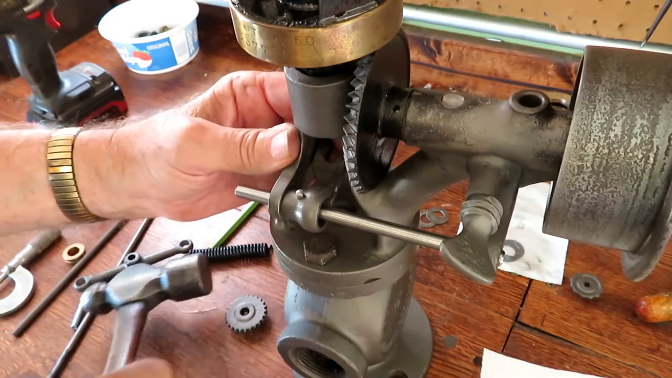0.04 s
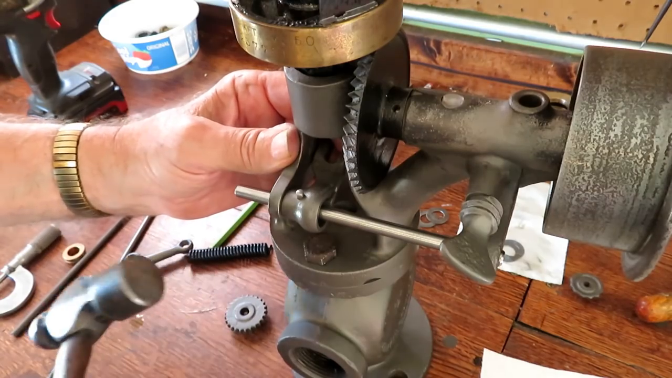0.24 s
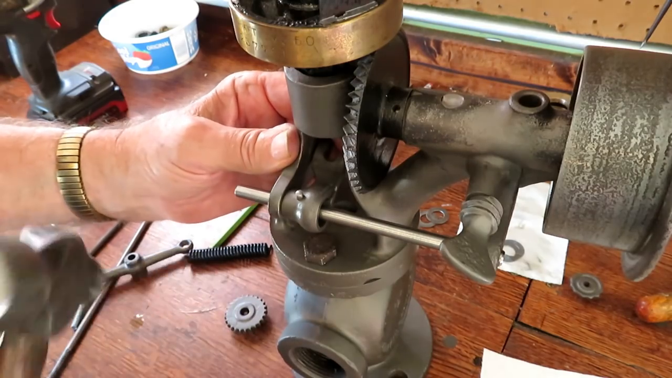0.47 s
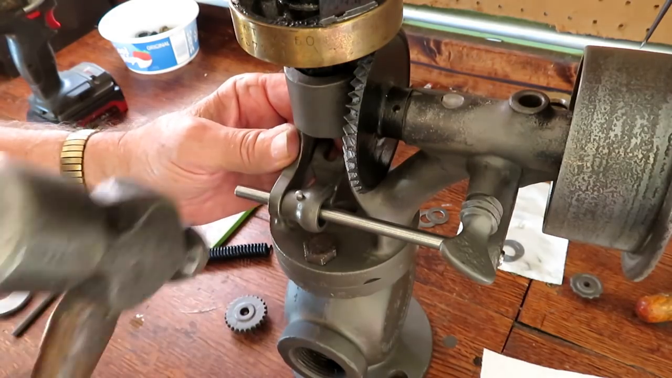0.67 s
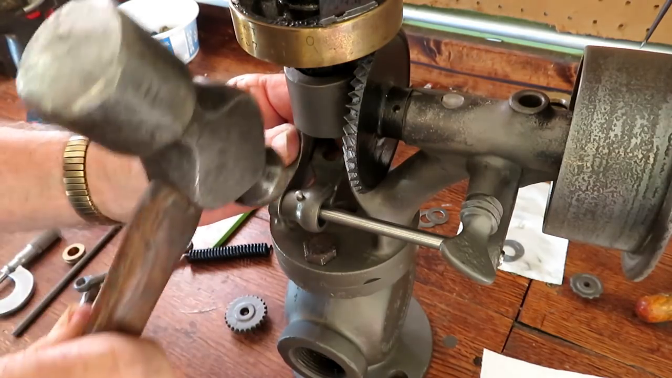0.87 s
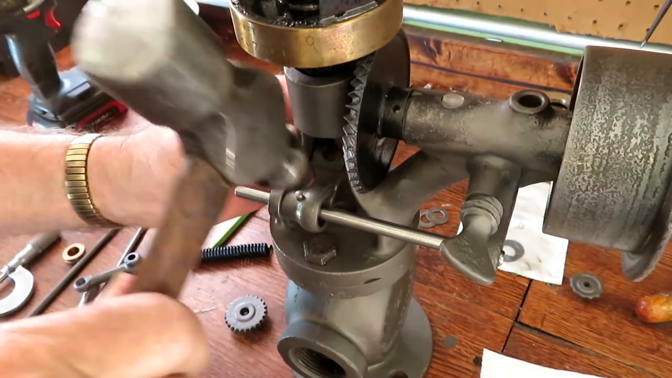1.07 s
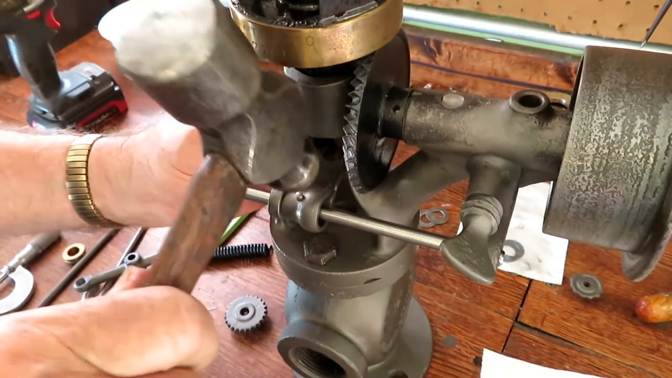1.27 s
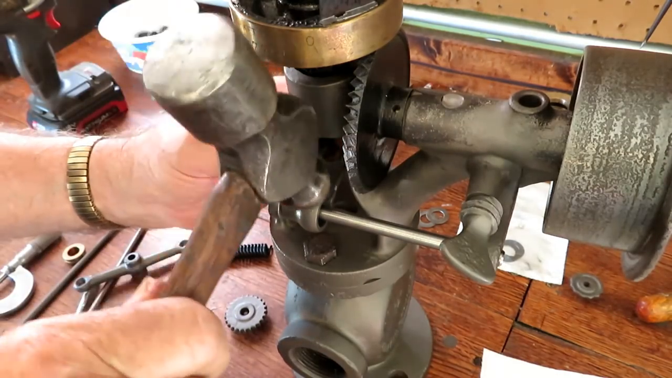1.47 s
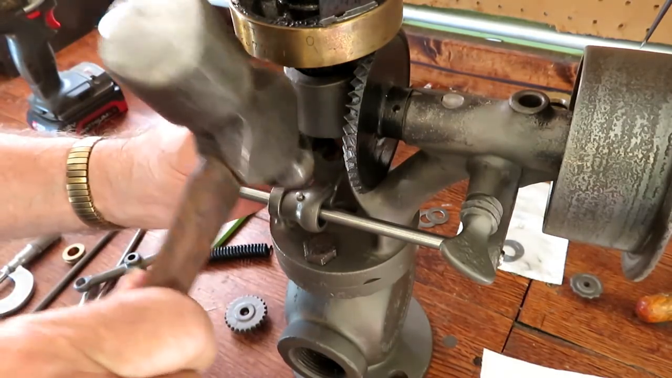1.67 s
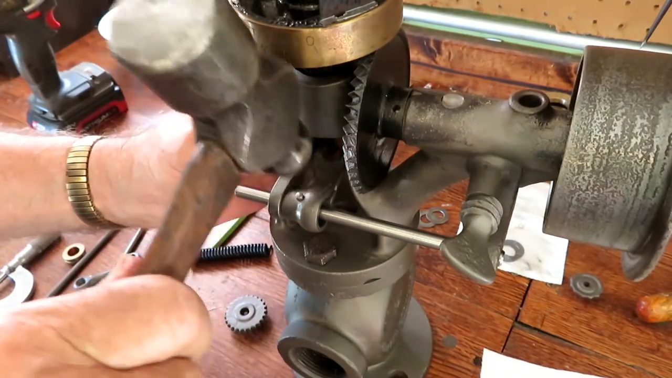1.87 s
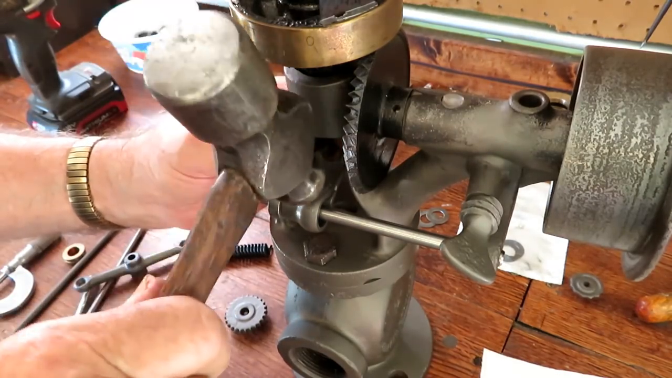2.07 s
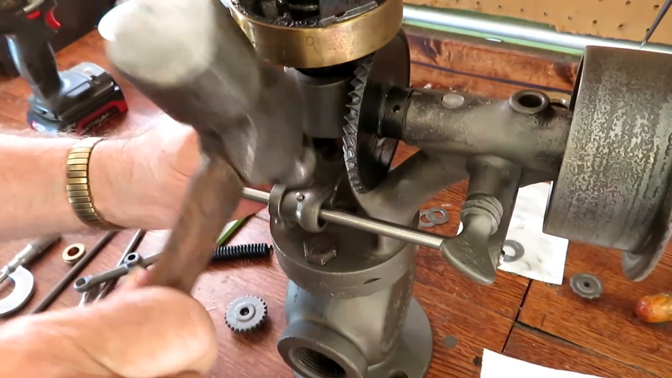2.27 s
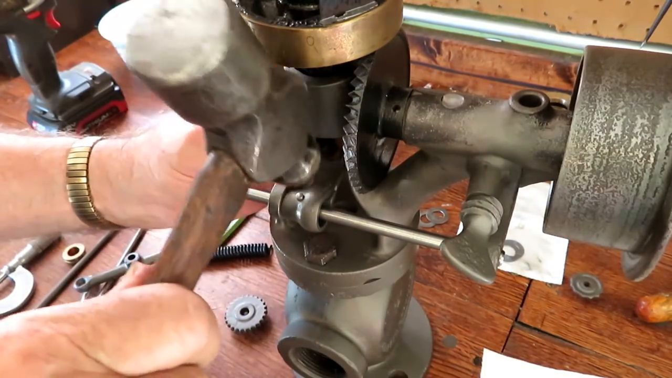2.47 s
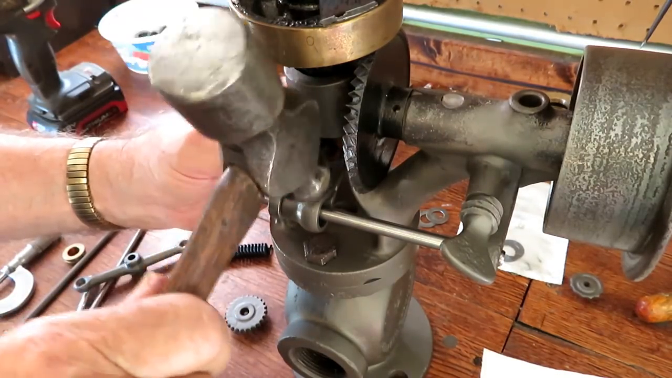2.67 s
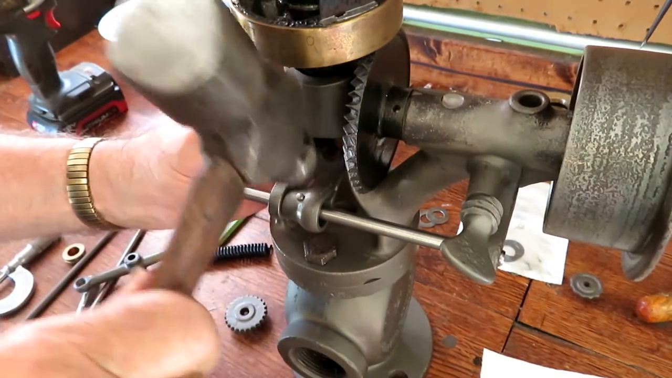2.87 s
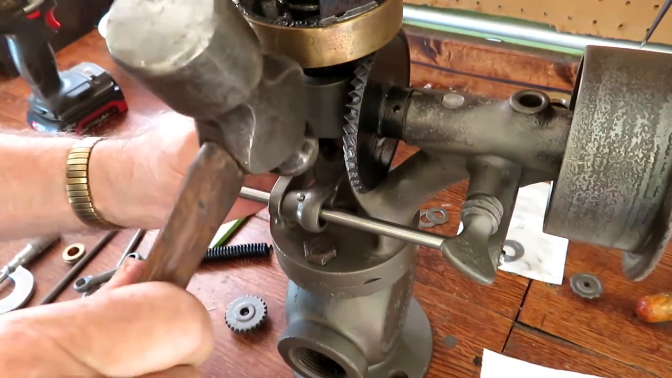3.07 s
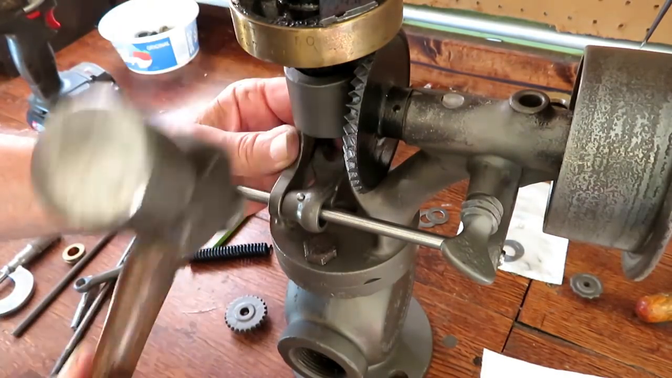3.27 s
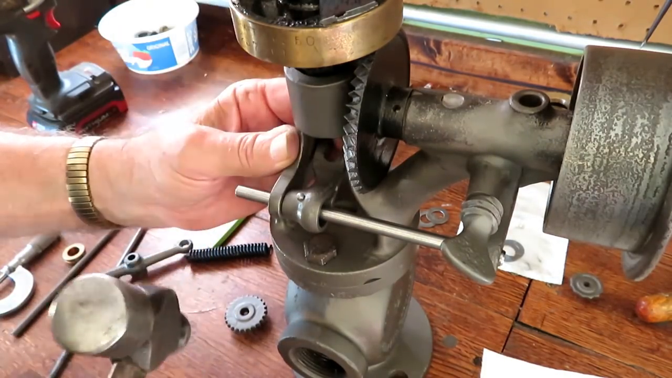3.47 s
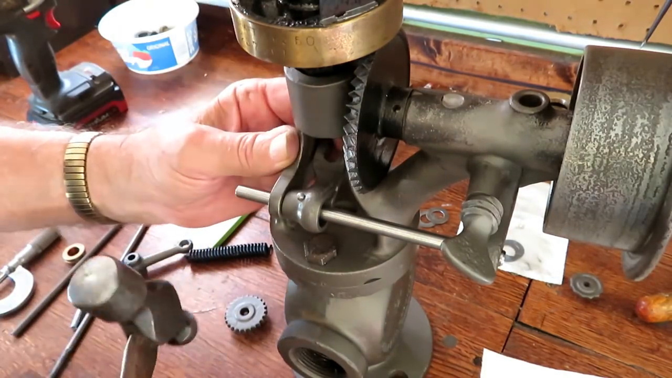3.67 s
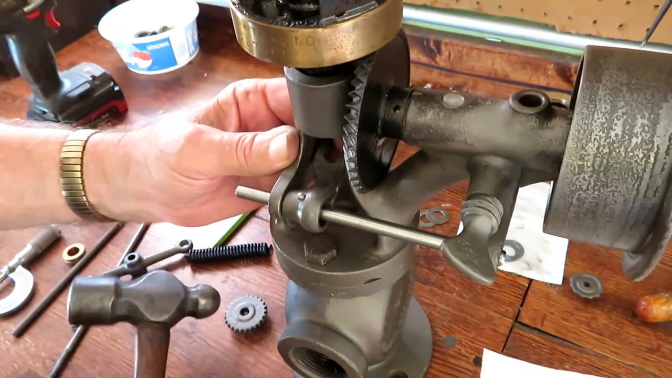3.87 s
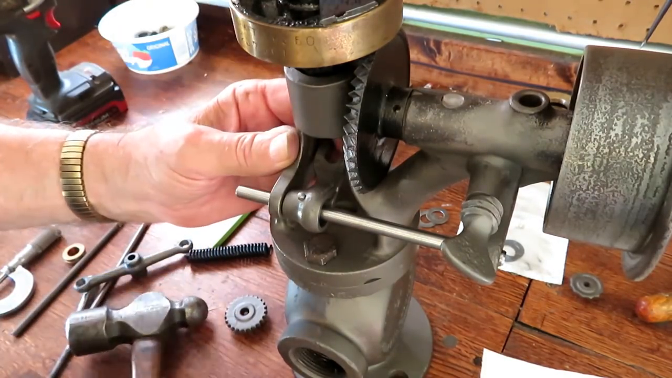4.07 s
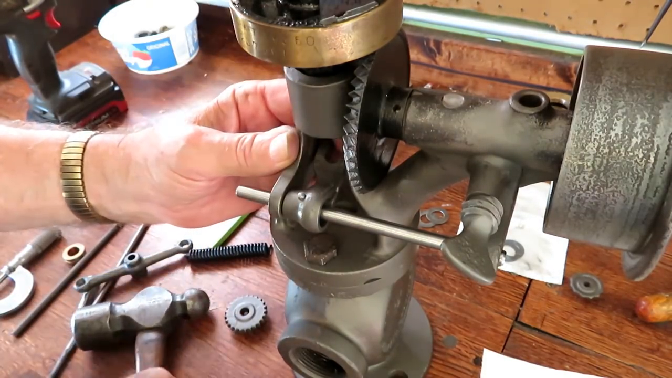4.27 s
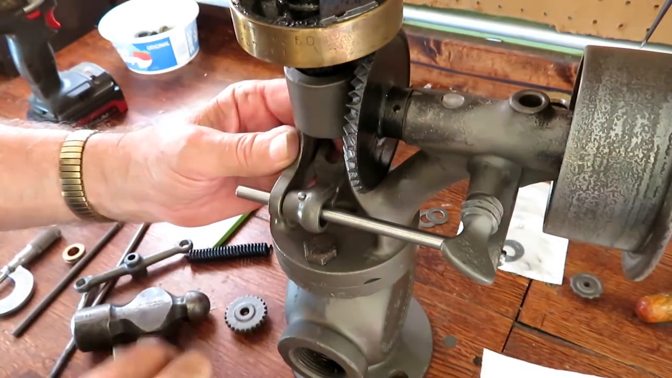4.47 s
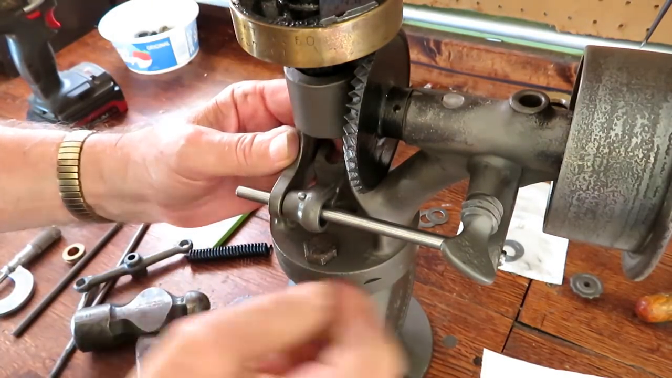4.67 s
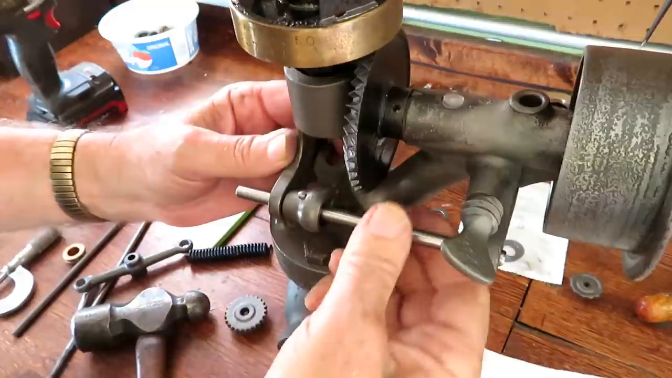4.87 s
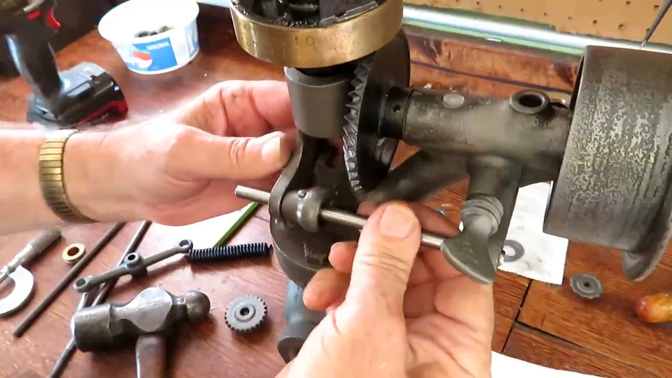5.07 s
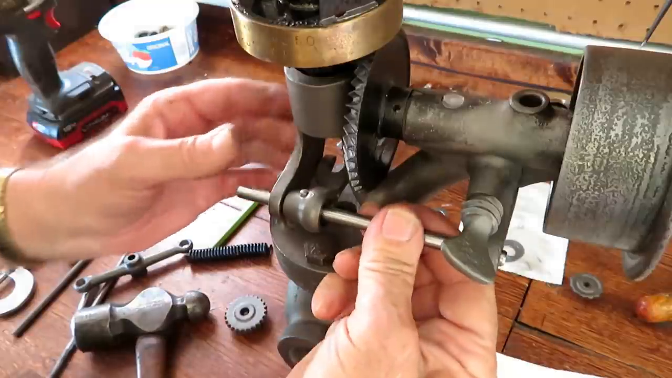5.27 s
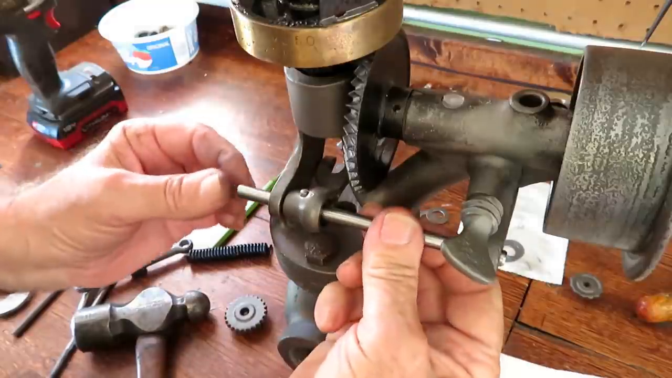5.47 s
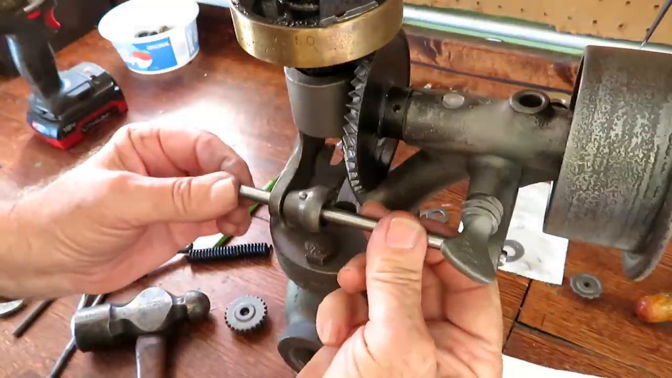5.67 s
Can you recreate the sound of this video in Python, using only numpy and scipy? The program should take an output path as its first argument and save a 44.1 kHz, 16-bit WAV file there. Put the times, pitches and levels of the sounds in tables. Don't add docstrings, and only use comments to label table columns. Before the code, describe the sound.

From 0 to 1.2 s, distant birds sing over a low outdoor rumble of road noise and faraway engines: rising whistles near 2.5 kHz about four a second, short gliding notes near 2.9 kHz and quick falling chips. A faint sleeve rustle comes around 0.5 s, a tiny metal tick at 0.8. A hammer then taps a pin in a cast-iron machine at 1.2, 1.5, 1.8, 2.1, 2.4, 2.7 and 3.0 s. The first is soft and thumpy; the others are loud, dry steel cracks with high pings, clatter, casting knock and bench thump, gradually duller, with a short shed reverberation. The background is pressed down, treble most, then creeps back. At 4.24 s the hammer head knocks on wood and rocks; at 4.46 the handle slaps down and settles. Faint distant birds return from 4.6 s, with a small metallic tick at 5.4. Close microphone, narrow stereo.

```python
import sys
import numpy as np
from scipy import signal
from scipy.fft import rfft, irfft
from scipy.io import wavfile
from scipy.ndimage import uniform_filter1d

SR = 44100
rng = np.random.default_rng(int(sys.argv[2]) if len(sys.argv) > 2 else 0)


def elevation(decibels):
    levels = np.asarray(decibels, float)
    return 10 ** (levels / 20)


def generate_wav(sig):
    pcm = np.round(np.clip(np.atleast_2d(sig).T, -1, 1) * 32767).astype(np.int16)
    wavfile.write(sys.argv[1], SR, pcm)


N = 253134


def evened(x):
    return x / np.sqrt(np.mean(x ** 2) + 1e-20)


def read(points, hz):
    f, value = np.transpose(points)
    return np.interp(np.log(hz + 1), np.log(f + 1), value)


def add(mix, s, sound):
    part = mix[round(s * SR):][:len(sound)]
    part += sound[:len(part)]


def colour(x, points):
    size = x.shape[-1]
    gain = elevation(read(points, np.fft.rfftfreq(size, 1 / SR)))
    return irfft(rfft(x) * gain, size)


def resonate(x, hz, width):
    turn = np.exp(2j * np.pi * np.cumsum(hz * np.ones(len(x))) / SR)
    r = np.exp(-np.pi * width / SR)
    return 2 * (turn * signal.lfilter([1 - r], [1, -r], x / turn)).real


def ring(modes, rise_s, lead_s=0., scatter=0.):
    hz, db, t60 = np.transpose(modes)[:, :, None]
    t = np.arange(SR // 2) / SR
    luck = scatter * rng.standard_normal((2, len(modes), 1))
    fall = elevation(db + 2.1 * luck[0] - 60 * t / t60)
    x = (fall * np.sin(2 * np.pi * hz * (t + lead_s) + luck[1])).sum(0)
    x = x * (1 - np.exp(-t / rise_s)) ** 2
    return x / abs(x).max()


def burst(points, rise_s, t60):
    t = np.arange(SR // 2) / SR
    noise = evened(colour(rng.standard_normal(len(t)), points))
    return noise * (1 - np.exp(-t / rise_s)) * elevation(-60 * t / t60)


def clamp(after_s, db, size=SR // 2):
    t = np.arange(size) / SR
    return elevation(db / (1 + np.exp(np.clip((after_s - t) / .0016, -50, 50))))


# f/Hz, share
QUICK_SHARE = [(70, 1.6), (250, 1.05), (1100, 1.05), (2700, .55), (14000, 0.67)]
# f/Hz, share
SLOW_SHARE = [(1100, 0.02), (2700, 1.05), (14000, 1.3)]
HEADROOM_DB, KNOCK_HEADROOM_DB, QUICK_DB_PER_S = 20.5, 10, 14
SLOW_STEP, LET_GO_S, LET_GO_BEND = .15, 2.85, 2.12


def press(t):
    blows = [(s, db + HEADROOM_DB) for s, db, *_ in TAPS]
    blows += [(s, db + KNOCK_HEADROOM_DB) for s, db, *_ in (HEAD_DOWN[0], HANDLE_DOWN[0])]
    s, excess = np.transpose(blows)[:, :, None]
    quick = np.maximum((excess - QUICK_DB_PER_S * (t - s)) * (t > s), 0).max(0)
    held = (t > s) * (1 - np.clip((t - s) / LET_GO_S, 0, 1) ** LET_GO_BEND)
    slow = SLOW_STEP * np.cumsum(excess, axis=0) * held
    return quick, slow[:len(TAPS)].max(0)


# f/Hz, level/dB (per Hz)
AIR = [(18, -15.5), (30, -9.5), (65, -11.5), (150, -2), (266, -1.5), (330, -9.5), (450, -13), (980, -14),
       (1850, -20), (2800, -23), (5000, -36), (9000, -45), (12500, -53), (14800, -73.5)]
AIR_DB = -33.5
# f/Hz, width/Hz, level/dB
DRONES = [(43.7, 8.1, -49.5), (76.96, 19, -43.5), (154, 20, -49.5), (267, 31, -45.5), (265.1, 10, -44)]
# t/s, level/dB
TRAFFIC = [(0, -0.4), (.9, -.5), (1.19, 1), (1.6, 2.2), (3.7, -1.1), (3.92, -1), (4.15, -4), (5.0, -3.5),
           (5.5, -4), (5.74, 0.5)]
# f/Hz, share
TRAFFIC_SHARE = [(70, 0.66), (250, 1.4), (1100, 0.52), (2700, .1)]
# f/Hz, level/dB
TOP_LOSS = [(2700, 0.08), (14000, -4.5)]
# f/Hz, level/dB
WIDE = [(30, -29.5), (100, -41), (400, -24), (2000, -20), (6000, -8), (13000, 0)]


def air():
    hz = np.fft.rfftfreq(1024, 1 / SR)
    wash = elevation(AIR_DB - 4.5) * evened(colour(rng.standard_normal(N), AIR))
    drones = sum(elevation(db) * evened(resonate(rng.standard_normal(N), f, w)) for f, w, db in DRONES)
    side = elevation(AIR_DB + 3.0) * colour(evened(colour(rng.standard_normal(N), AIR)), WIDE)
    _, t, z = signal.stft(np.array([wash + drones, side]), SR, nperseg=1024, noverlap=768)
    patches = uniform_filter1d(rng.standard_normal(z.shape[1:]), 12, 0)
    patches = evened(uniform_filter1d(patches, 12, 1))
    quick, slow = press(t)
    traffic_db = np.interp(t, *np.transpose(TRAFFIC))
    level_db = np.outer(read(TRAFFIC_SHARE, hz), traffic_db) + read(TOP_LOSS, hz)[:, None]
    level_db -= np.outer(read(QUICK_SHARE, hz), quick) + np.outer(read(SLOW_SHARE, hz), slow)
    return signal.istft(z * elevation(level_db + 1.2 * patches), SR, nperseg=1024, noverlap=768)[1][:, :N]


ATTACK_S, RELEASE_S = .025, 0.015
FLUTTER_HZ, FLUTTER_DB = 28, 2


def whistle(hz, fade_db, width):
    t = np.arange(len(hz)) / SR
    blur = resonate(resonate(rng.standard_normal(len(t)), hz, width), hz, width)
    tone = 60 / width * np.sin(2 * np.pi * np.cumsum(hz) / SR) + evened(blur)
    edges = np.minimum(t / ATTACK_S, 1) * np.minimum(t[::-1] / RELEASE_S, 1)
    flutter_db = FLUTTER_DB * np.cos(2 * np.pi * FLUTTER_HZ * (t - ATTACK_S))
    return tone * edges * elevation(fade_db * t / t[-1] + flutter_db)


# t/s, length/s, f/Hz, glide/Hz, level/dB
HIGH_BIRD = [(.005, 0.059, 2810, -20, -45), (.065, 0.066, 2840, 120, -45), (.17, .05, 2880, 60, -55),
             (.23, 0.073, 2860, -30, -46), (.295, .08, 2830, 120, -46.5), (.4, .06, 2970, 30, -53),
             (.47, .075, 2890, -80, -44.5), (.555, 0.068, 2940, -60, -43), (.64, 0.122, 2940, 40, -52),
             (.75, .05, 2850, -40, -51), (.81, 0.08, 2830, 20, -46.5), (.9, .08, 2840, 30, -56),
             (.99, .07, 2890, -20, -48.5), (1.065, 0.12, 2860, -50, -49.5), (1.165, .05, 2860, 100, -54)]
# t/s, length/s, f/Hz, glide/Hz, level/dB
FAR_BIRDS = [(4.62, .12, 2320, -69, -58.5), (4.83, 0.12, 3270, 50, -63), (4.94, 0.11, 3250, -32, -59),
             (4.93, .1, 2920, -68, -59), (5.125, .165, 2310, -20, -55.5), (5.21, 0.13, 2860, -28, -53.5),
             (5.31, .12, 2760, -40, -54), (5.26, 0.17, 3150, -130, -61), (5.62, .07, 2200, -40, -48.5),
             (5.69, .07, 2200, 10, -52), (5.2, .08, 2850, 10, -58)]
# t/s, length/s, top f/Hz, level/dB
LOW_BIRD = [(0.126, 0.17, 2536, -43.5), (.36, .2, 2546, -44), (0.603, 0.18, 2521, -41.5),
            (.88, .17, 2570, -44), (1.121, 0.15, 2540, -43.5)]
# t/s, length/s, from f/Hz, to f/Hz, level/dB
CHIPS = [(0.206, .016, 4340, 3140, -56), (0.449, .018, 4300, 3030, -44), (0.726, 0.016, 4250, 3000, -43.5),
         (0.986, 0.015, 3830, 3153, -46)]
SCOOP_HZ, SCOOP_S = 240, .06
CALL_FADE_DB, NOTE_FADE_DB = -10, -4.5
NEAR_BLUR_HZ, FAR_BLUR_HZ = 100, 170


def birds():
    out = np.zeros(N)
    for s, length, top_hz, db in LOW_BIRD:
        hz = top_hz - SCOOP_HZ * np.exp(-np.arange(0, length, 1 / SR) / SCOOP_S)
        add(out, s, elevation(db) * whistle(hz, CALL_FADE_DB, NEAR_BLUR_HZ))
    for rows, width in ((HIGH_BIRD, NEAR_BLUR_HZ), (FAR_BIRDS, FAR_BLUR_HZ)):
        for s, length, from_hz, glide, db in rows:
            hz = from_hz + glide * np.arange(0, length, 1 / SR) / length
            add(out, s, elevation(db) * whistle(hz, NOTE_FADE_DB, width))
    for s, length, from_hz, to_hz, db in CHIPS:
        hz = np.geomspace(from_hz, to_hz, round(length * SR))
        add(out, s, elevation(db) * np.sin(2 * np.pi * np.cumsum(hz) / SR) * np.hanning(len(hz)))
    return out


# f/Hz, time to fall 60 dB/s
ROOM = [(60, .6), (160, 0.35), (420, 0.52), (1100, 0.6), (2900, 0.52), (7700, 0.62), (14000, 0.34)]
# f/Hz, level/dB
WET = [(30, -29), (70, -7.5), (200, -4.5), (600, -1.5), (2000, -3.5), (6000, -19), (9000, -18.5),
       (12000, -14.5), (14500, -18), (15500, -27)]


def shed(x, count=3):
    out = np.zeros((2, N))
    turn = (np.arange(N) / SR + .1) // .3 % count
    for k in range(count):
        sparse = np.zeros((2, SR))
        at = np.arange(300, SR - 20, 20) + rng.integers(0, 20, (2, (SR - 301) // 20))
        np.put_along_axis(sparse, at, rng.choice([-1., 1.], at.shape), 1)
        hz, t, z = signal.stft(sparse, SR, nperseg=256)
        fall = elevation(-60 * t / read(ROOM, hz)[:, None])
        fall = fall / np.sqrt((fall ** 2).sum(1, keepdims=True))
        tail = signal.istft(z * fall, SR, nperseg=256)[1] * np.sqrt(20 / 128)
        share = uniform_filter1d(1. * (turn == k), size=2000)
        out += signal.fftconvolve((x * share)[None], tail, axes=1)[:, :N]
    mid, side = colour(out, WET)
    return np.array([mid, colour(side, WIDE)])


# t/s, level/dB
TICKS = [
    (0.8066, -46),
    (1.3794, -48),
    (5.3794, -33),
]
# t/s, length/s, level/dB
RUSTLE = (.4, 0.25, -63.5)
# f/Hz, level/dB
CLATTER = [(500, -10), (1200, -7.5), (2100, -10.5), (4300, -4.5), (6000, -13.5), (7500, -23), (10000, -44)]
# f/Hz, level/dB
SIZZLE = [(4000, -27), (6500, -8.5), (9000, -3.5), (10800, -15), (12600, -3.5), (14700, -4), (15600, -15.5),
          (16500, -29)]


def handling():
    near = np.zeros(N)
    s, length, db = RUSTLE
    size = round(length * SR)
    add(near, s, elevation(db) * evened(colour(rng.standard_normal(size), SIZZLE)) * np.hanning(size))
    for s, db in TICKS:
        tick = burst(CLATTER, .0005, 0.014) + 0.24 * burst(SIZZLE, .0005, 0.022)
        add(near, s, elevation(db - 14) * tick)
    return near


# t/s, crack level/dB, ping level/dB, bench thump level/dB, upper crack level/dB
TAPS = [
    (1.2167, -13, -28, -6, -22.5),
    (1.5226, -6, -18.5, -9.5, -9),
    (1.8033, -6, -20.5, -11.5, -12.5),
    (2.0919, -6.5, -18.5, -12.5, -19.5),
    (2.403, -7.5, -20.5, -13, -19.5),
    (2.703, -8.5, -19, -13, -19.5),
    (3.003, -8, -21, -13.5, -18),
]
# f/Hz, level/dB, time to fall 60 dB/s
CRACK = [(2088, 16.5, 0.0082), (2306, -8.5, 0.005), (2860, -7.5, 0.065), (3070, -3, 0.018),
         (3680, -11.5, 0.05), (4173, 7.5, 0.0077), (4600, -7.5, 0.025)]
PING = [(13660, -5, 0.0096), (13310, -9.5, .01), (14500, -4, 0.018)]
THUMP = [(75.5, -17.5, 0.94), (114.7, -7.5, 0.41), (150, 3.5, 0.13), (186.8, -9, 0.65)]
KNOCK = [(268.7, -10.5, .1), (353.6, 1.5, 0.04), (395, -13, 0.11), (528, -6.5, 0.038), (727, -14, .04),
         (808.4, -14, 0.058), (1073, -18.5, 0.037)]
HEAD = [(4240, -42, .3), (5750, -28, .2), (6800, -46, .25), (7400, -39, .2), (5600, -44, .4)]
PARTS = [(2130, -1, .25), (2500, -2, .25), (3720, -1, .3), (4280, -1, .35), (5200, -8, .3), (6800, -12, .3),
         (8000, -15, .35), (9300, -18, .25), (11200, -19, .25)]
LOWER_DB, SEATING_DB_PER_S = 3.0, 4.5
LAG_MS, LAG_GROWTH = .82, 1.5
KNOCK_DB, KNOCK_TRADE, KNOCK_DB_PER_S = -20, 0.56, 1.76
HUM_DB, HUM_DB_PER_S = -43, 3
PARTS_DB, PARTS_SPREAD = -29, .03
PUSH_DB, DULL_PER_OCTAVE = -4.5, .3


def taps():
    near, far = np.zeros((2, N))
    click = np.eye(1, 512, 256)[0]
    for s, crack_db, ping_db, thump_db, high_db in TAPS:
        since_s = s - TAPS[0][0]
        pushing_db = thump_db - crack_db
        knock_db = KNOCK_DB - KNOCK_TRADE * thump_db + KNOCK_DB_PER_S * since_s
        low_db = crack_db + LOWER_DB - SEATING_DB_PER_S * since_s
        hum_db = HUM_DB - HUM_DB_PER_S * since_s
        lag_ms = LAG_MS * elevation(LAG_GROWTH * pushing_db)
        detune = 1 + rng.standard_normal((len(PARTS), 1)) * [PARTS_SPREAD, 0, 0]
        dull = DULL_PER_OCTAVE * (pushing_db - PUSH_DB)
        clatter = [(hz, db - dull * np.log2(hz / 2500)) for hz, db in CLATTER]

        rings = elevation(low_db - 4.0) * ring(CRACK[:4], .001, scatter=0.94)
        rings = rings + elevation(high_db + 2.0) * ring(CRACK[4:], 0.00091, scatter=1.0)
        rings = rings + elevation(hum_db) * ring(HEAD, .01, scatter=1.1) * clamp(.07, -12)
        rings = rings + elevation(crack_db + PARTS_DB) * ring(PARTS * detune, .006, scatter=1.6)
        rings = rings + elevation(ping_db - 2.5) * ring(PING, .0002, scatter=1.0)
        noise = elevation(crack_db - 6.0) * burst(clatter, 0.00027, 0.037)
        noise = noise + elevation(ping_db + 2) * burst(SIZZLE, 0.0002, 0.02)
        add(near, s - .0003, rings + noise)

        flash = elevation(crack_db - 12) * evened(colour(click, clatter))
        flash = flash + elevation(ping_db - 12.0) * evened(colour(click, SIZZLE))
        add(far, s - 256 / SR, flash)

        thud = elevation(thump_db + 7.0) * ring(THUMP, 0.0038, 0.0004)
        thud = thud + elevation(knock_db + 3.0) * ring(KNOCK, 0.0024, 0.00083, scatter=0.54)
        add(near, s + (lag_ms - 1.2) / 1000, thud * clamp(0.013, -12))
        add(far, s + (lag_ms - .6) / 1000, thud * clamp(0.011, -14.5))
    return near, far


# t/s, level/dB, scuff level/dB, head ring level/dB, rise/ms
HEAD_DOWN = [
    (4.241, -3.5, -23.5, -25, 1.5),
    (4.297, -5, -24, -41.5, 1.4),
    (4.256, -7, -34, -38, 3.1),
    (4.334, -13, -20, -39, 7.2),
]
HANDLE_DOWN = [
    (4.4624, 0, -10, -33, 0.53),
    (4.477, -20, -25, -41, 1.7),
    (4.508, -11.5, -14, -33, 3),
    (4.521, -13, -16, -42, 6.7),
]
# f/Hz, level/dB, time to fall 60 dB/s
BENCH = [(108, -1.5, 0.089), (205.5, -3, 0.21), (305, 6, 0.059), (407, -2.5, 0.047), (536, 0, 0.11),
         (660, 3, 0.04), (883, -10, .04), (962, -2.5, 0.036), (1206, -13, 0.035)]
# f/Hz, level/dB, time to fall 60 dB/s
HANDLE = [(234.4, -4, 0.084), (339, -4, 0.067), (393, -2, 0.076), (529, -5.5, 0.064), (652, -4.5, 0.064),
          (810, 2, 0.019), (1081, -3.5, 0.041), (1240, -5.5, 0.08), (1475, -5.5, 0.033)]
# f/Hz, level/dB
SCUFF = [(300, -12), (900, -2), (1800, -9.5), (2600, -15), (4300, -21), (5500, -33.5), (9000, -44.5),
         (13000, -58)]
# f/Hz, level/dB
WOOD = [(90, -21), (200, 6), (400, -0.5), (800, -4), (1500, -14.5), (2600, -25), (4200, -27.5),
        (6000, -37.5), (12000, -57)]


def laid_down():
    near, far = np.zeros((2, N))
    flash = evened(colour(np.eye(1, 1024, 512)[0], WOOD))
    for rows, modes, wet_db in ((HEAD_DOWN, BENCH, -18), (HANDLE_DOWN, HANDLE, -11)):
        for s, db, scuff_db, head_db, rise_ms in rows:
            knock = ring(modes, rise_ms / 800, scatter=1.0) * clamp(.009, -7.5)
            knock = knock + elevation(scuff_db) * burst(SCUFF, rise_ms / 700, 0.045)
            hum = elevation(head_db - 28.0) * ring(HEAD[1:4], 0.005) * clamp(0.049, -16)
            add(near, s - .001, elevation(db - 1.5) * (knock + hum))
            add(far, s + .008 - 512 / SR, elevation(db + wet_db) * flash)
    return near, far


def scene():
    song = birds()
    near, far = taps()
    laid, laid_far = laid_down()
    laid = laid + handling()
    mid, side = air() + shed(far + laid_far + .2 * laid + .9 * song)
    near = colour(near + laid, [(25, -33.5), (45, -13), (70, -2), (120, -0.5)])
    side = side + elevation(-5) * colour(np.roll(near, 9), WIDE)
    mid = mid + near + 0.91 * song
    return np.array([mid + side, mid - side])


def band_limit(x):
    return signal.sosfilt(signal.butter(12, 16630, fs=SR, output="sos"), x)


def record(dry):
    low = signal.firwin(255, 16400, window=("kaiser", 9), fs=SR)
    x = signal.oaconvolve(dry, low[None], "same")
    return band_limit(1.405 * np.tanh(x / 1.24))


dry = scene()
out = record(dry)
generate_wav(out)
```